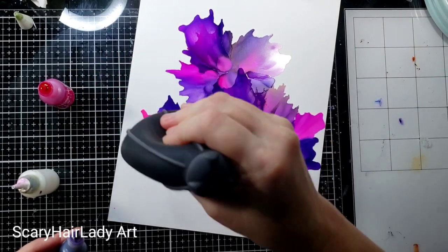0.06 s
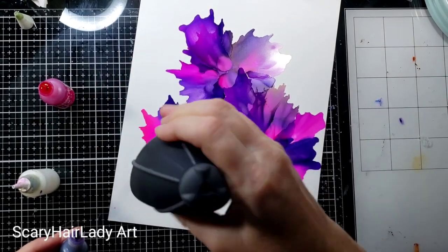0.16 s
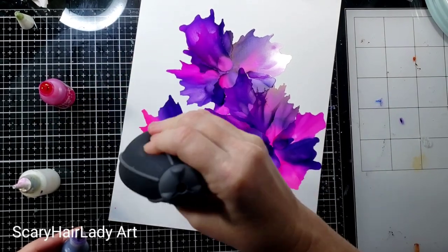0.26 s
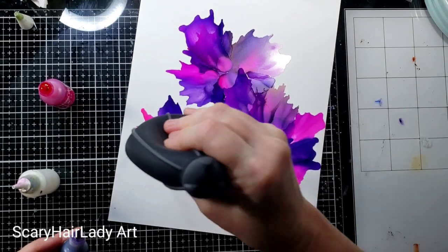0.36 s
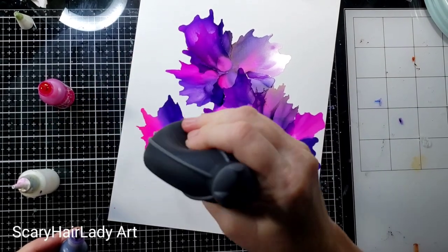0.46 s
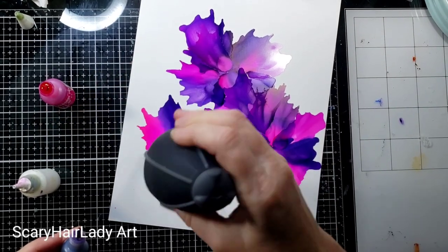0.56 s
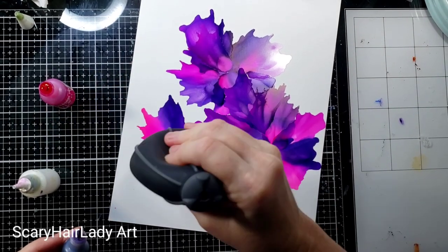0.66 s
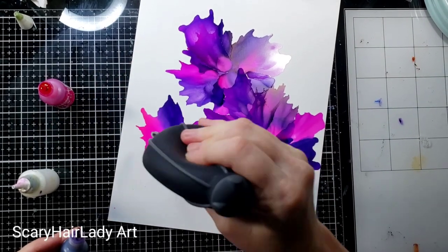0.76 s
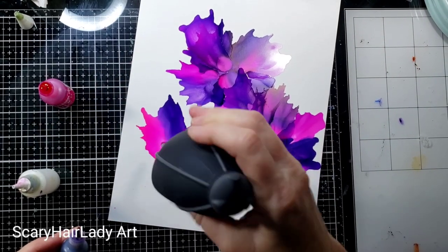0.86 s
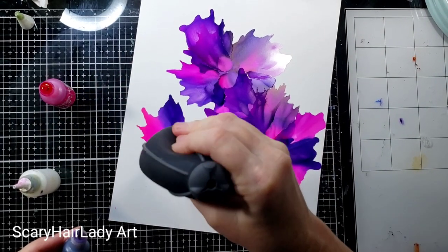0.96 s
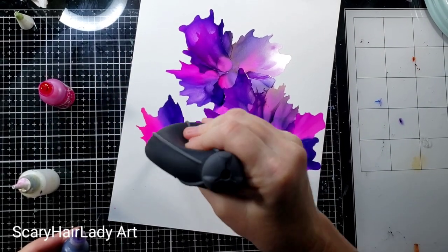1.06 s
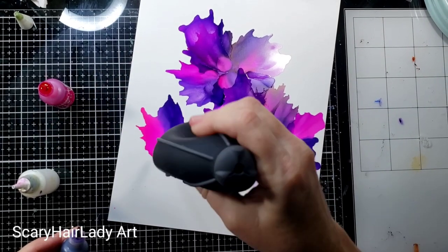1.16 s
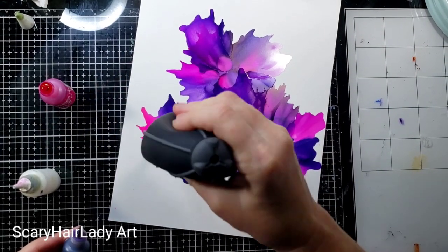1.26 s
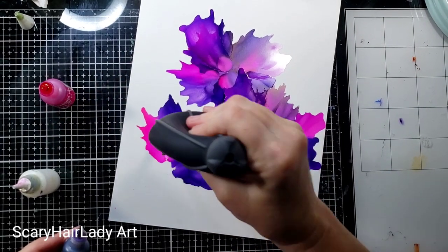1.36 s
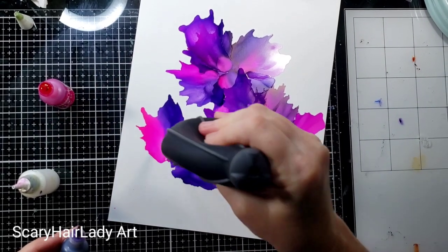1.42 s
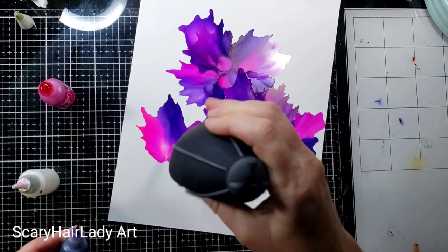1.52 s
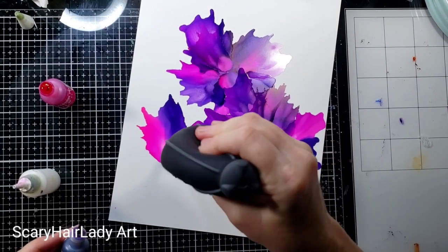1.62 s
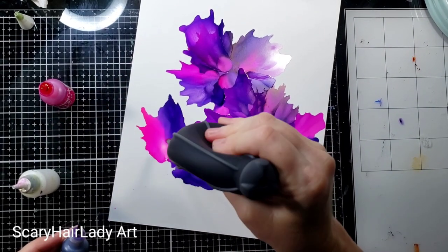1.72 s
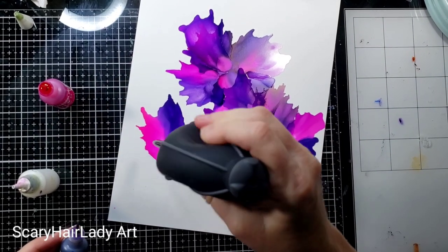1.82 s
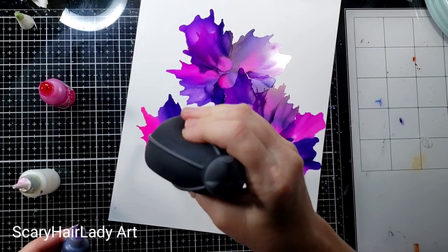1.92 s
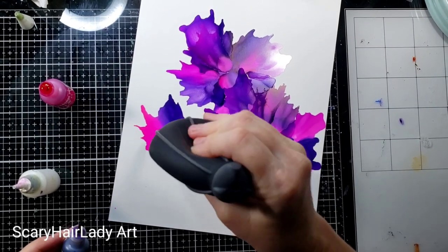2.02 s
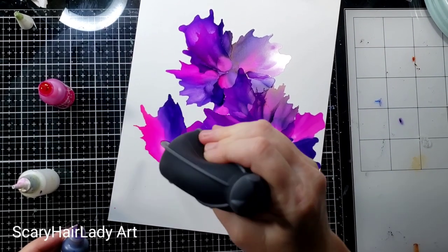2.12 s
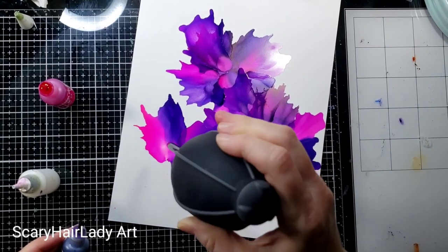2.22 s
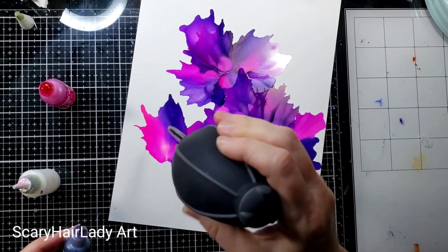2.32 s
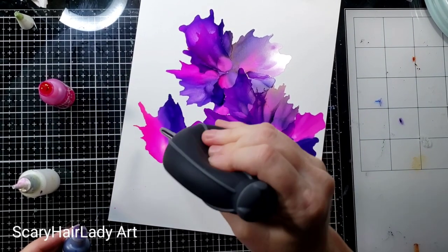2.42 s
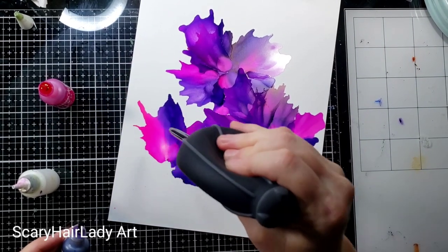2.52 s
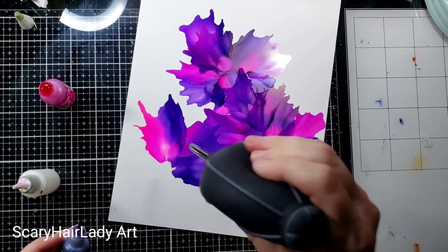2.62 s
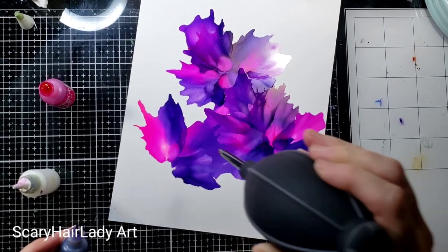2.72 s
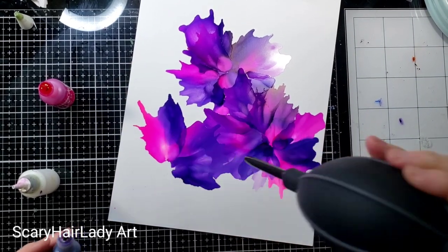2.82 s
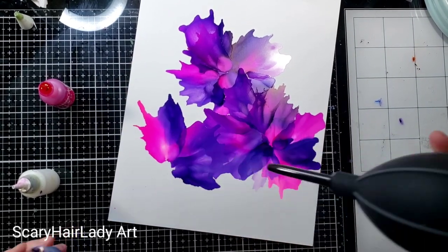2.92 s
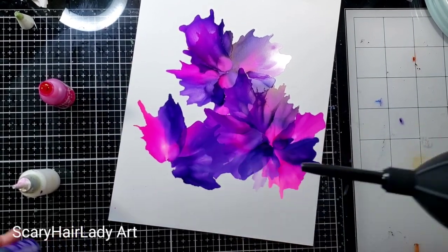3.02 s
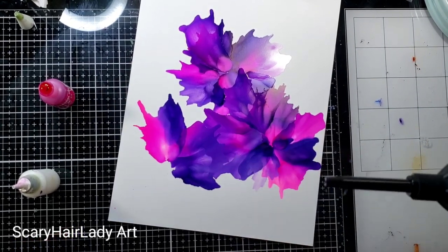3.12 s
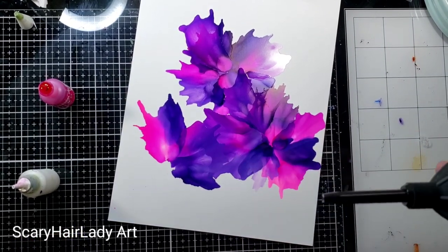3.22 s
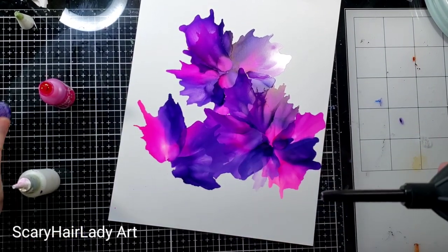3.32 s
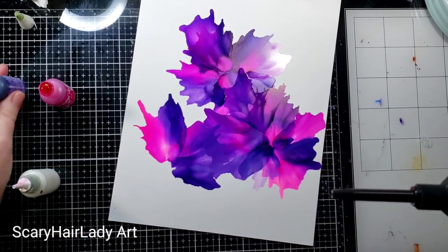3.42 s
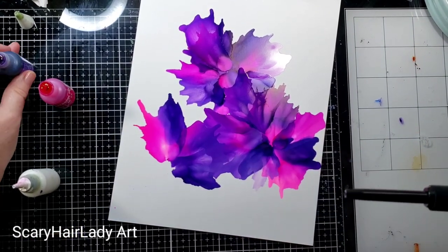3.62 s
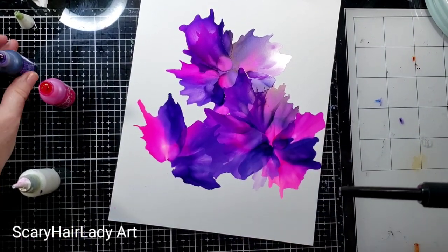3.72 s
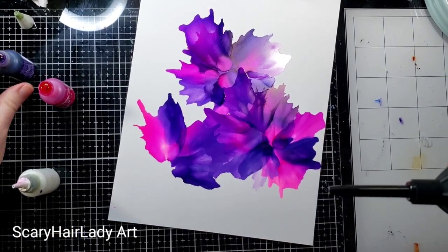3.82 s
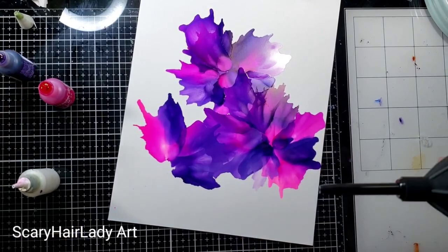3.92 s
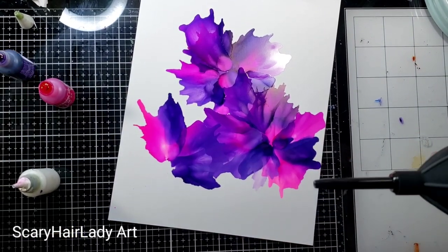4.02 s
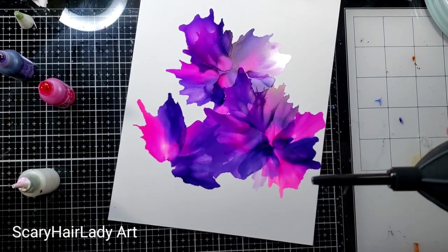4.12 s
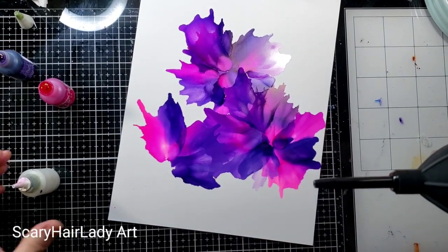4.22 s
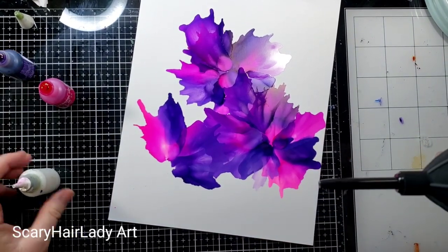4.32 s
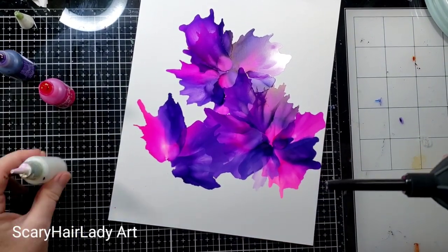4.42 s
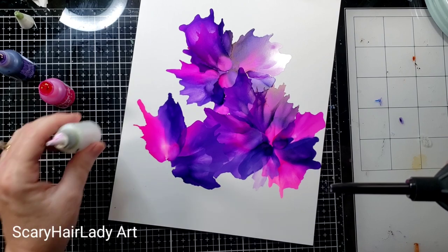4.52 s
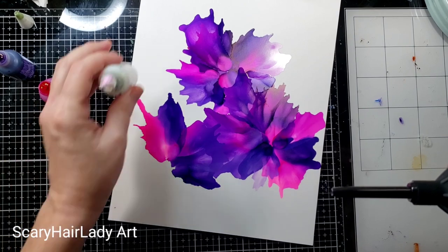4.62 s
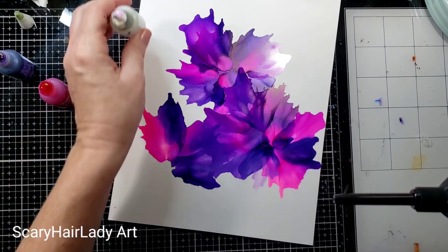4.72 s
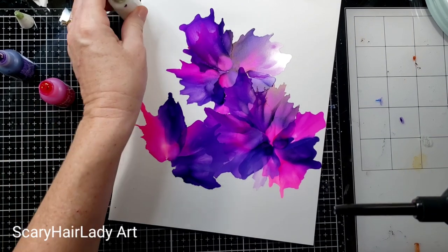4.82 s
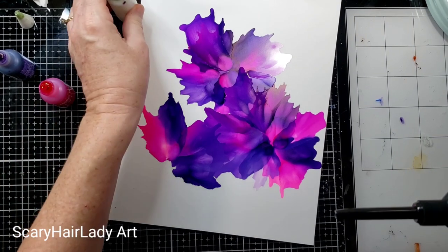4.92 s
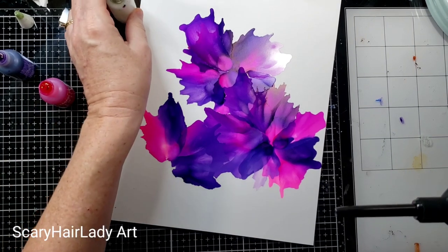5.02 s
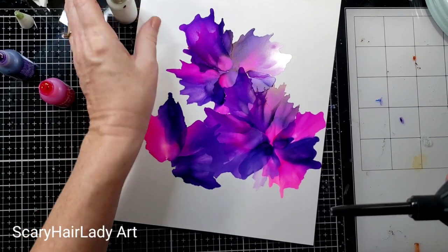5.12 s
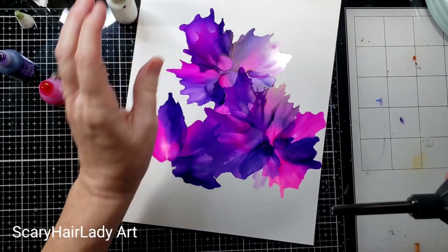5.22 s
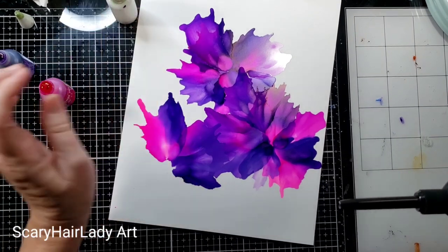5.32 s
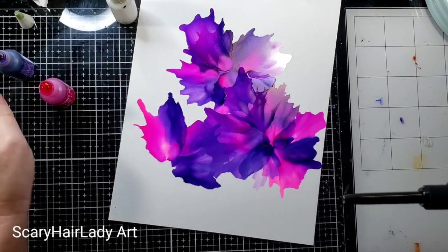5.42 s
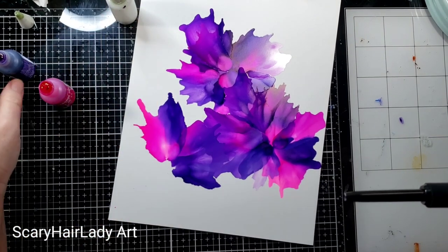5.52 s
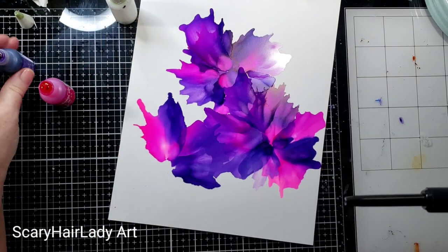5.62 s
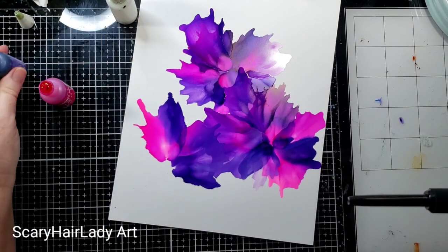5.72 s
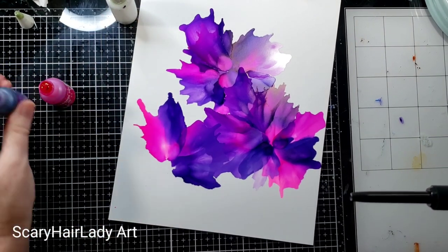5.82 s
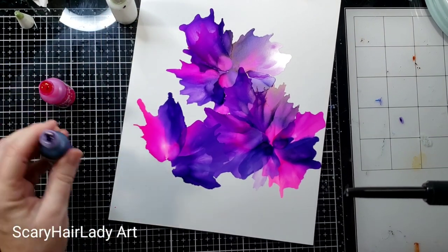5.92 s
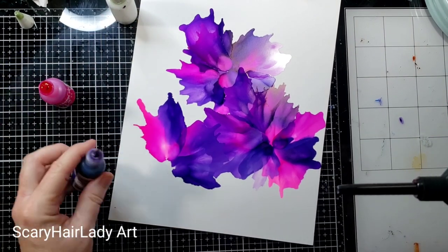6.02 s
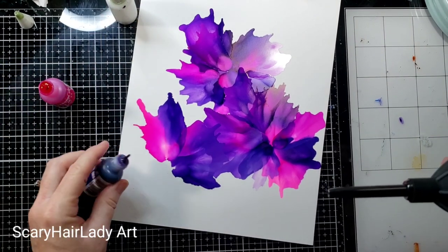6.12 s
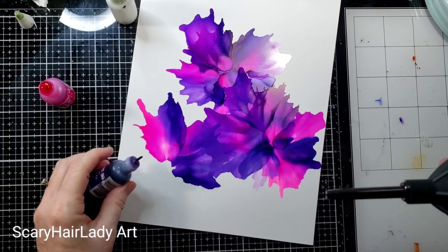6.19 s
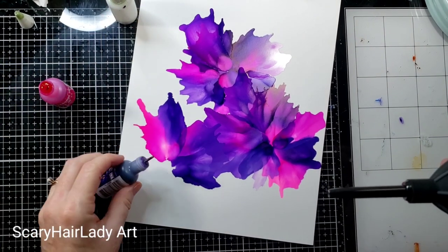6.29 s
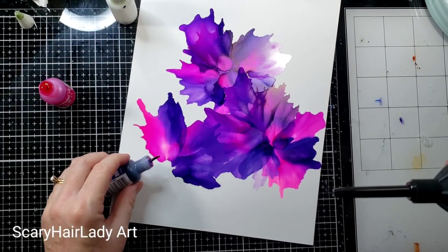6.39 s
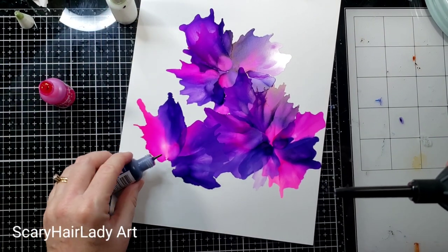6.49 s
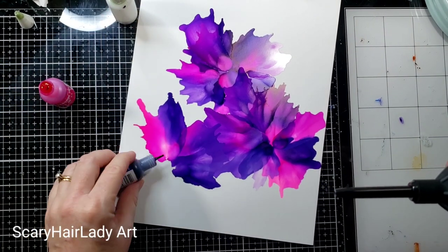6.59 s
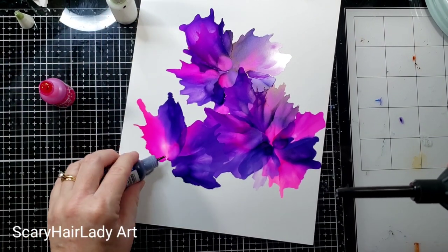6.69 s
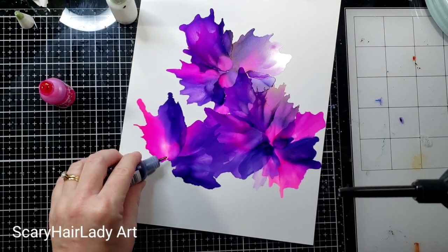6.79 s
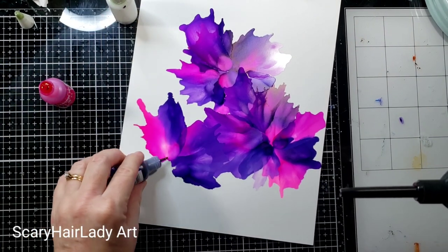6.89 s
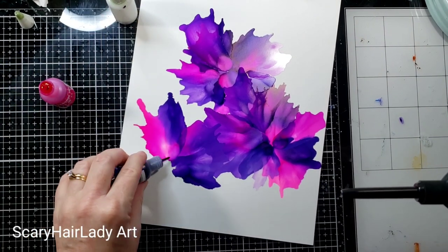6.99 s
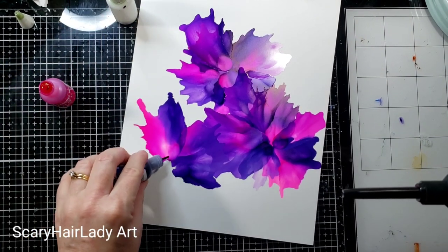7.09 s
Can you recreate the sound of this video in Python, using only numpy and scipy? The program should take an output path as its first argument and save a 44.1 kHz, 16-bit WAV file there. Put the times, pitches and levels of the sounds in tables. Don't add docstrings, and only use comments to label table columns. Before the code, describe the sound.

A hand-squeezed rubber blower fires eight crisp, high hisses of air about three a second, each followed by a thinner suction wheeze and small thumps as the bulb folds and springs out. After a pause, little plastic bottles are set down, picked up and set down again with short hollow clacks and rattles. Faint hand rustle follows. Close stereo pickup in a small room, with low motor and mains hum beneath.

```python
import sys
import numpy as np
from scipy import signal
from scipy.fft import rfft, irfft
from scipy.io import wavfile
from scipy.ndimage import uniform_filter1d, map_coordinates

SR = 44100
rng = np.random.default_rng(int(sys.argv[2]) if len(sys.argv) > 2 else 0)


def elevation(decibels):
    levels = np.asarray(decibels, float)
    return 10 ** (levels / 20)


def to_wav(sig):
    pcm = np.clip(np.atleast_2d(sig), -1, 1) * 32767
    pcm = np.round(pcm).astype(np.int16)
    wavfile.write(sys.argv[1], SR, pcm.T)


N = 315315
SIZE = 256

# start_s, peak_db
RELEASES = [(0.4869, -34), (.8336, -30), (1.17, -38), (1.497, -37), (1.8242, -35), (2.15, -36),
            (2.6151, -36)]


def evened(x):
    return x / np.sqrt(np.mean(x ** 2) + 1e-20)


def read(points, hz):
    f, value = np.transpose(points)
    return np.interp(np.log(hz + 1), np.log(f + 1), value)


def shape(points, hz):
    return evened(elevation(read(points, hz)))


def grid(size=SIZE):
    return np.fft.rfftfreq(size, 1 / SR), np.arange(4 * N // size + 5) * size / 4 / SR


def air(magnitude, same, lag, size=SIZE):
    hz = np.fft.rfftfreq(size)[:, None]
    a, b, c, d = rng.standard_normal((*magnitude.shape[::-1], 4)).T
    same = np.clip(same, 0, 1)
    left = a + 1j * b
    right = same * left * np.exp(-2j * np.pi * hz * lag) + np.sqrt(1 - same ** 2) * (c + 1j * d)
    spectra = np.array([left, right]) * magnitude / np.sqrt(size)
    return signal.istft(spectra, nperseg=size, noverlap=size * 3 // 4)[1][:, :N]


def eddies(flicker_db, patchy_db):
    hz, t = grid()
    flicker = evened(uniform_filter1d(rng.standard_normal(len(t)), size=3))
    patches = rng.standard_normal((len(t), len(hz))).T
    patches = uniform_filter1d(patches, size=4, axis=0)
    patches = uniform_filter1d(patches, size=25, axis=1)
    return flicker_db * flicker + patchy_db * evened(patches)


def bell(t, s, half, roundness, late, start=1.0):
    u = (t - s[:, None]) / half[:, None]
    distance = np.minimum(np.where(u > 0, u / late, -u), 4)
    return -20 * distance ** np.where(u > 0, roundness, roundness * start)


def hum():
    # time_s, level_db
    motor_db = [(0, -58), (1.79, -55), (2.7, -58.5), (2.85, -61), (3.36, -62.5), (3.5, -60), (3.75, -65),
                (4.2, -57), (4.42, -56.5), (4.66, -56), (5.04, -66.5), (5.5, -54.5), (5.79, -66),
                (6.15, -56), (6.47, -57.5), (6.8, -59.5), (7.0, -57.5), (7.15, -79)]
    motor_hz, motor_wander_hz, motor_sway_db = 77.6, 1.28, 2.85
    mains_hz, mains_wander_hz, mains_db = 236.4, 2.3, -61
    t = np.arange(N) / SR

    def drift():
        return evened(sum(np.sin(2 * np.pi * (f * t + rng.random())) for f in np.geomspace(.3, 6, 12)))

    wander, sway = drift(), drift()
    motor = np.sin(2 * np.pi * np.cumsum(motor_hz + motor_wander_hz * wander) / SR)
    mains = np.sin(2 * np.pi * np.cumsum(mains_hz + mains_wander_hz * sway) / SR)
    swell_db = np.interp(t, *np.transpose(motor_db)) + motor_sway_db * sway
    return evened(motor) * elevation(swell_db) + elevation(mains_db) * evened(mains)


def room_air():
    # freq_hz, density_db
    wash_db = [(25, -34), (55, -8.5), (75, -8), (105, -22.5), (155, -7), (195, -18), (228, -4.5),
               (290, -13), (500, -18), (700, -24.5), (1050, -28.5), (1600, -20.5), (2500, -37),
               (5000, -54.5)]
    # freq_hz, likeness_0to1
    likeness = [(60, 1), (300, 0.47), (700, 0.44), (1500, 0.62), (2200, 0.1194), (15000, 0.054)]
    # freq_hz, difference_db
    lean_db = [(60, -7), (180, 2.5), (550, -5), (1650, -1), (4970, 0.5), (15000, -15.5)]
    # freq_hz, width_hz, level_db
    fuzzy_lines = [(126, 6, -70), (489, 25, -74.5), (613, 25, -75)]
    wash_level_db = -55.5
    hz, t = grid(size=4096)
    power = shape(wash_db, hz) ** 2 * elevation(2 * (wash_level_db - 2.0))
    for f, width, db in fuzzy_lines:
        line = evened(1 / (1 + (2 * (hz - f) / width) ** 2))
        power += (line * elevation(db)) ** 2
    magnitude = np.sqrt(power)[:, None] * elevation(5.0) * np.ones(len(t))
    wash = air(magnitude, read(likeness, hz)[:, None], -13.5, size=4096)
    lean = elevation(read(lean_db, np.fft.rfftfreq(N, 1 / SR)) / 2)
    return irfft(rfft(wash + hum()) * [lean, 1 / lean], N)


def rustle():
    # top_s, half_length_s, level_db
    swishes = [(2.91, .08, -77), (4.605, 0.042, -68), (4.674, 0.071, -78), (5.016, 0.15, -79),
               (5.073, 0.046, -80), (5.633, .07, -74), (5.755, .07, -76), (6.4, 0.062, -73.5)]
    # freq_hz, density_db
    cloth = [(4000, -16), (7500, -16), (9500, -12), (12000, 4.5), (15500, -1.5)]
    # start_s, level_db, fade_db_per_s
    drags = [
        (5.105, -47.5, 46),
        (5.27, -75, 46.5),
        (6.065, -57, 70),
    ]
    # freq_hz, density_db
    mat = [(150, -7), (280, 12), (600, -2), (1000, -6.5), (1600, -4.5), (2500, -18.5), (5000, -40)]
    drag_rise_s = .006
    hz, t = grid()
    s, half, db = np.transpose(swishes)
    strokes = shape(cloth, hz)[:, None] * elevation(db + 9.5) @ elevation(bell(t, s, half, 3.2, 1.06))
    swish = strokes * elevation(eddies(0.9, 1.4))
    grip = sum(np.clip((t - s) / drag_rise_s, 0, 1) * elevation(db - fade * abs(t - s)) for s, db, fade in drags)
    drag = shape(mat, hz)[:, None] * grip * elevation(2.0 + eddies(1.65, 2.2))
    return air(swish + drag, 0.22, 6.1)


def ticks():
    # start_s, peak_db, centre_hz, width_hz, length_ms
    snap_rows = [(2.915, -65, 13500, 4000, 4), (4.393, -48, 14100, 5000, 1.8),
                 (4.398, -40.5, 13800, 5400, 2.7), (4.401, -50, 4800, 2490, 3.4),
                 (5.694, -69, 1852, 3000, 2.9), (6.064, -56, 3600, 4000, 1.5),
                 (4.548, -65.5, 3500, 900, 3.9)]
    valve_db, valve_hz, valve_width_hz, valve_ms = -56, 4000, 9300, 2.0
    out, t, f = np.zeros((2, N)), np.arange(1024) / SR, np.fft.rfftfreq(1024, 1 / SR)
    valve = [(s - .003, valve_db, valve_hz, valve_width_hz, valve_ms) for s, db in RELEASES]
    for s, db, hz, width, ms in [*snap_rows, *valve]:
        window = np.exp(-((f - hz) / width) ** 2 * 2)
        band = irfft(rfft(rng.standard_normal((2, len(t)))) * window)
        out[:, round(s * SR):][:, :len(t)] += elevation(db) * evened(band) * np.exp(-t / (ms / 1000))
    return out


def bottle(hits, drive_db, crack, crack_db):
    # freq_hz, t60_s
    modes = [(130, 0.041), (183, 0.055), (262, 0.081), (410, 0.044), (510, 0.057), (640, 0.059),
             (740, 0.14), (792, 0.07), (1000, 0.017), (1090, 0.083), (1145, 0.061), (1350, 0.071),
             (1435, 0.08), (1600, 0.025), (1760, 0.067), (2040, 0.066), (2770, 0.02), (3680, 0.057),
             (5080, 0.039)]
    dull_hz, bright_s, bright_left = 2605, 0.0038, 0.27
    t = np.arange(9000) / SR
    blow, rattle, bright = np.zeros(N), np.zeros(N), np.zeros(N)
    for s, db, ms in hits:
        at = round(s * SR)
        blow[at] += elevation(db)
        chatter = elevation(db) * rng.standard_normal(len(t)) * np.exp(-(t / (ms / 700)) ** 1.47) / np.sqrt(ms)
        rattle[at:][:len(t)] += chatter
        bright[at:][:len(t)] += chatter * (bright_left + np.exp(-t / bright_s))
    ring = np.zeros((2, len(t)))
    for (hz, t60), db in zip(modes, drive_db):
        apart = rng.standard_normal() * min(hz / 900, 1.4) * np.array([[.5], [-.5]])
        beat = 1 + .5 * np.cos(2 * np.pi * (0.013 * hz * t + rng.random((2, 1))))
        rise = 1 - np.exp(-t * hz * 1.16)
        ring += elevation(db - 60 * t / t60) * np.sin(2 * np.pi * hz * t + apart) * rise * beat
    hz = np.fft.rfftfreq(SIZE, 1 / SR)
    turns = rng.random(len(hz)) + np.minimum(hz / 1800, 1) * rng.random((2, len(hz)))
    colour = shape(crack, hz) * np.exp(2j * np.pi * turns)
    low = 1 / (1 + (hz / dull_hz) ** 4)
    out = signal.fftconvolve((blow + 0.07 * rattle)[None], ring, axes=1)[:, :N]
    for drive, part in ((rattle, low), (bright, 1 - low)):
        tick = irfft(colour * part) * np.exp(-t[:SIZE] / 0.0026)
        out += elevation(crack_db) * signal.fftconvolve(drive[None], tick, axes=1)[:, :N]
    return out


def bottles():
    # start_s, peak_db, rattle_ms
    ink_hits = [
        (3.5565, -32.5, 7.6),
        (3.566, -33.5, 32),
        (3.768, -63, 9),
    ]
    pickup_hits = [
        (4.399, -37.5, 10),
        (4.404, -34, 24),
        (4.415, -51, 22),
    ]
    white_hits = [
        (4.9395, -27, 9.6),
        (4.9473, -34, 38),
        (4.955, -30, 12),
    ]
    wobble_hits = [(5.101, -39, 20), (5.14, -38, 4.5), (5.151, -42.5, 15), (5.194, -42.5, 6.7),
                   (5.205, -62, 18), (5.27, -57, 11), (5.391, -65, 8), (6.064, -54.5, 19)]
    ink = [-29, -6, -0.5, 2.5, -5.5, -3, -19, -1.5, 2, -22, -3.5, -19, -17, -6, -25, -34, -12, -23.5, -16.5]
    pickup = [-13, -28, -30, -14, -1.5, -17, -13, -10, -9, -2.5, -8.5, -21, -32, 0, -5, -18, -38, -41, -28]
    white = [-13, -6, -2.5, -13.5, -5, -23, -32, -5.5, -23, -5.5, -16, -12, -7, -23, -39, -29, -33, -21,
             -28]
    wobble = [-21, -19, 5.5, -27, -4.5, -27, -28, -10, -4, -12.5, -10, -18, -5.5, -11, -6.5, -41, -17, -46,
              -28]
    # freq_hz, density_db
    ink_crack = [(200, -11), (500, -19), (1200, -3), (2000, -15), (4000, -16.5), (7000, -31),
                 (11000, -28.5), (15500, -41)]
    pickup_crack = [(300, -7), (1300, -6), (2200, 0), (3000, -36), (5000, -16), (8000, -34), (12000, -13),
                    (15500, -24)]
    white_crack = [(200, -3), (300, 11), (700, -8), (1500, -11), (2300, -25), (4500, -27), (7500, -34),
                   (12000, -28), (15500, -19)]
    wobble_crack = [(200, -2), (300, -3), (700, -13), (1600, 7.5), (2200, -17), (2900, -26), (4000, -18.5),
                    (15500, -24)]
    out = bottle(ink_hits, ink, ink_crack, 7.4)
    out += bottle(pickup_hits, pickup, pickup_crack, 9.4)
    out += bottle(white_hits, white, white_crack, 10.8)
    out += bottle(wobble_hits, wobble, wobble_crack, 2.5)
    return out + ticks()


def thumps(rows, ms, sign, echo, ring_hz, ring):
    out, t = np.zeros(N), np.arange(-400, 4000) / SR
    u = t / (ms / 1000)
    pulse = (1 - 0.95 * u ** 2 - 0.18 * u) * np.exp(-u ** 2 / 2)
    pulse += echo * np.roll(pulse, round(.0105 * SR))
    late = np.maximum(t - .0015, 0)
    pulse -= ring * np.sin(2 * np.pi * ring_hz * late) * elevation(-60 * late / 0.097)
    for s, db in rows:
        out[round((s + t[0]) * SR):][:len(t)] += sign * elevation(db + 1.3) * pulse
    return out


def bulb():
    # start_s, peak_db
    folds = [(.0328, -43.5), (.3704, -41.5), (.7221, -40), (1.0535, -40), (1.3696, -42), (1.7052, -41),
             (2.0587, -43.5), (2.4969, -40)]
    snaps = [(0.2102, -36.5), (0.5654, -34), (0.9108, -33), (1.2466, -31), (1.5766, -34)]
    soft_snaps = [(1.9118, -52), (2.2406, -46), (2.7051, -48), (6.067, -49.5), (6.162, -63)]
    crisp_ms, soft_ms = 0.96, 3
    wall = thumps(folds, crisp_ms, -0.99, 0.05, 152.3, 0.56)
    wall += thumps(RELEASES, crisp_ms, -0.56, 0.51, 120, 0.41)
    wall += thumps(snaps, crisp_ms, 0.73, 0.16, 98, 0.86)
    wall += thumps(soft_snaps, soft_ms, -2.15, 0.11, 91, 0.32)
    return wall * elevation(np.array([[-.7], [.7]]))


def refill():
    # middle_s, half_length_s, suction_db, gain_start_to_end_db, low_part_rel_db
    refills = [(0.192, 0.054, -44.5, 8, -13.5), (0.545, 0.06, -45.5, 8, -10.5),
               (0.891, 0.057, -44.5, 5.5, -10.5), (1.221, 0.052, -44.5, 0, -12.5),
               (1.551, 0.052, -42.5, -1, -13.5), (1.879, 0.05, -44, -1, -12),
               (2.22, 0.061, -44.5, -6, -8.5), (2.684, 0.063, -45, 0, -8.5)]
    # freq_hz, density_db
    suction = [(4500, -18.5), (6000, -2.5), (9000, -5), (12000, -1), (15000, -1), (16000, -14.5)]
    suction_low = [(1200, -21.5), (2100, -4), (3200, -10), (4400, 4.5), (5500, -9), (7000, -10.5)]
    mode_db = [3.2, 1.1, 1.4, 1, 3.6, 4.74, 5.7]
    tube_hz, tube_width_hz = 2055, 472
    hz, t = grid()
    s, half, level_db, gain_db, low_db = np.transpose(refills)
    slope = np.clip((t - s[:, None]) / half[:, None], -1, 1) / 2
    flow_db = bell(t, s, half, roundness=6.4, late=0.86, start=1.2)
    flow = elevation(level_db[:, None] + gain_db[:, None] * slope + flow_db)
    tube_db = sum(db / (1 + (2 * (hz - (k + 1) * tube_hz) / tube_width_hz) ** 2) for k, db in enumerate(mode_db))
    colour = shape(suction, hz)[:, None] * flow.sum(0)
    colour += shape(suction_low, hz)[:, None] * (elevation(low_db - 2.0) @ flow)
    return air(colour * elevation(tube_db[:, None] + 2.0 + eddies(1.2, 1.5)), 0.21, 1.37)


def jet():
    # fastest_flow_s, half_length_s, jet_db, splash_db, flutter_db
    squeezes = [(-.012, 0.068, -32, -48, -65), (.341, 0.056, -29, -48, -66.5),
                (0.692, 0.057, -28, -49.5, -67), (1.027, 0.055, -27, -50, -66),
                (1.348, 0.051, -27, -49.5, -71.5), (1.681, 0.05, -29, -44.5, -66.5),
                (2.022, 0.049, -37, -47.5, -60), (2.465, 0.058, -36, -53.5, -57.5)]
    # freq_hz, density_db
    nozzle = [(3000, -45), (4200, -20), (6000, -10), (7500, -4.5), (8200, -7.5), (10000, -0.5), (11700, 5),
              (13000, 3.5), (15300, 3)]
    splash = [(1300, -31.5), (2000, -5), (3000, 3.5), (4000, 7), (5200, 0), (7000, -8)]
    flutter = [(450, -9), (800, -5.5), (1400, -0.5), (2200, -3.5), (3500, -43)]
    # freq_hz, likeness_0to1
    likeness = [(1000, 0.27), (2500, 0.46), (3500, 0.11), (4500, 0.78), (5500, 0.23), (10000, 0.25),
                (15000, 0.1)]
    splash_share, flutter_share = .6, .4
    hz, t = grid()
    s, half, jet_db, splash_db, flutter_db = np.transpose(squeezes)
    flow_db = bell(t, s, half, roundness=2.58, late=0.95, start=1.23)
    colour = 0
    for points, db, share in ((nozzle, jet_db, 1), (splash, splash_db, splash_share),
                              (flutter, flutter_db, flutter_share)):
        colour = colour + shape(points, hz)[:, None] * elevation(db[:, None] + share * flow_db).sum(0)
    return air(colour * elevation(4.5 + eddies(0.6, 2.5)), read(likeness, hz)[:, None], 5.6)


def off_table(x):
    echo_ms, echo_gain, path_sway = 1.9, 0.38, 0.1426
    t = np.arange(N)
    sway = np.sin(2 * np.pi * (np.array([[.7], [.9]]) * t / SR + rng.random((2, 1))))
    late = echo_ms / 1000 * SR * (1 + path_sway * sway)
    return x + echo_gain * np.array([map_coordinates(c, [t - d], order=3) for c, d in zip(x, late)])


def room(x):
    # freq_hz, t60_s
    decay = [(200, 0.27), (1000, 0.34), (4000, 0.19), (12000, .15)]
    taps = np.zeros((2, SR // 2))
    at = np.arange(200, SR // 2 - 20, 20)
    at = at + rng.integers(0, 20, (2, len(at)))
    np.put_along_axis(taps, at, rng.choice([-1., 1.], at.shape), 1)
    hz, t, z = signal.stft(taps, SR, nperseg=SIZE)
    same = np.exp(-(hz / 600) ** 2)[:, None]
    z[1] = same * z[0] + np.sqrt(1 - same ** 2) * z[1]
    tail = signal.istft(z * elevation(-60 * t / read(decay, hz)[:, None]), SR, nperseg=SIZE)[1]
    return signal.fftconvolve(x, tail / np.linalg.norm(tail[0]), axes=1)[:, :N]


def scene():
    blower = off_table(jet() + refill())
    knocks, wall = bottles(), bulb()
    tail = room(elevation(-5.5) * blower + elevation(-13.5) * knocks + elevation(-7.5) * wall)
    return blower + knocks + wall + tail + rustle() + room_air()


def band_limit(x):
    return signal.sosfilt(signal.butter(12, 16800, fs=SR, output="sos"), x)


def record(dry):
    # freq_hz, density_db
    self_hiss = [(1760, -26.5), (3000, -7), (4170, -4), (6610, -14), (7180, -10), (9320, -15.5),
                 (11500, -3), (15500, -3.5)]
    hiss_db, bass_hz, edge_hz = -78, 45, 15660
    hz, t = grid()
    hiss = air(shape(self_hiss, hz)[:, None] * elevation(hiss_db + 8.0) * np.ones(len(t)), .05, 0)
    mix = signal.sosfilt(signal.butter(2, bass_hz, "high", fs=SR, output="sos"), dry + hiss)
    top_cut = signal.firwin(901, edge_hz, window=("kaiser", 8), fs=SR)
    mix = signal.oaconvolve(mix, top_cut[None], "same")
    return band_limit(mix)


dry = scene()
out = record(dry)
to_wav(out)
```